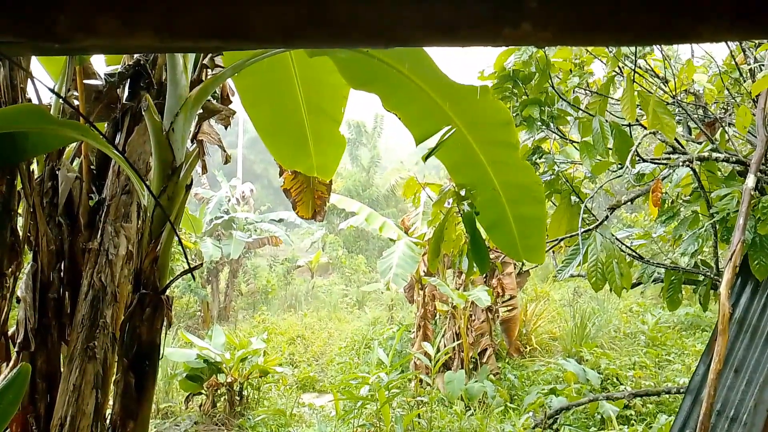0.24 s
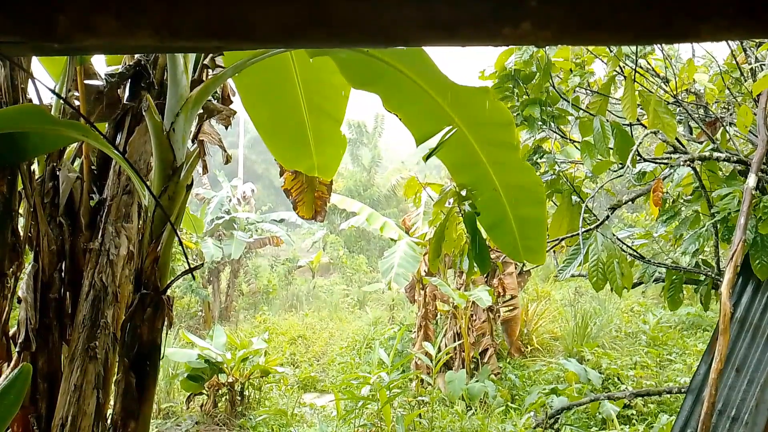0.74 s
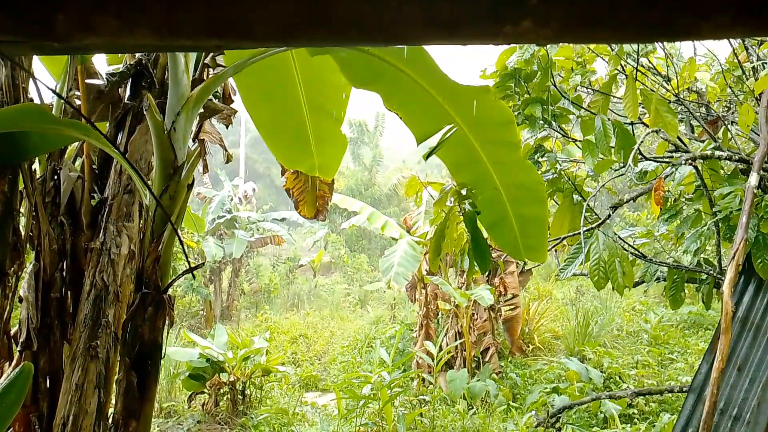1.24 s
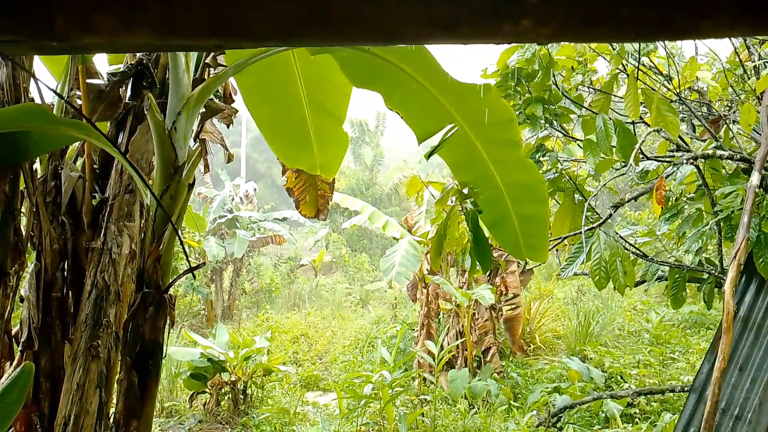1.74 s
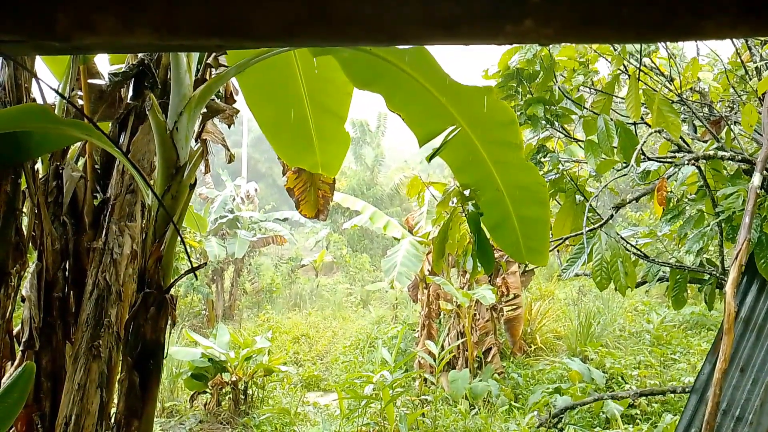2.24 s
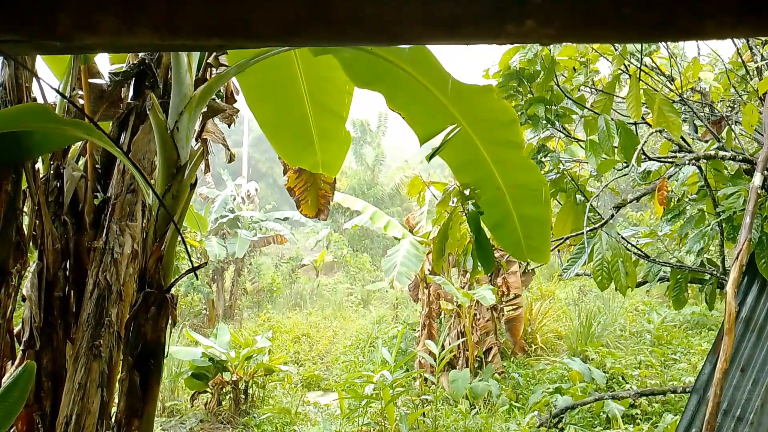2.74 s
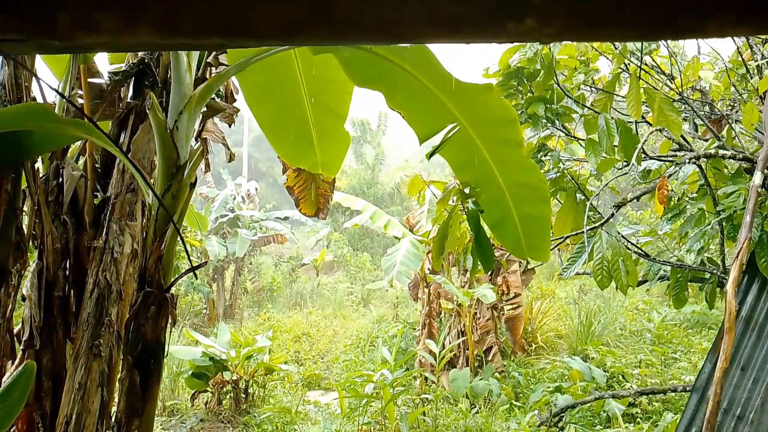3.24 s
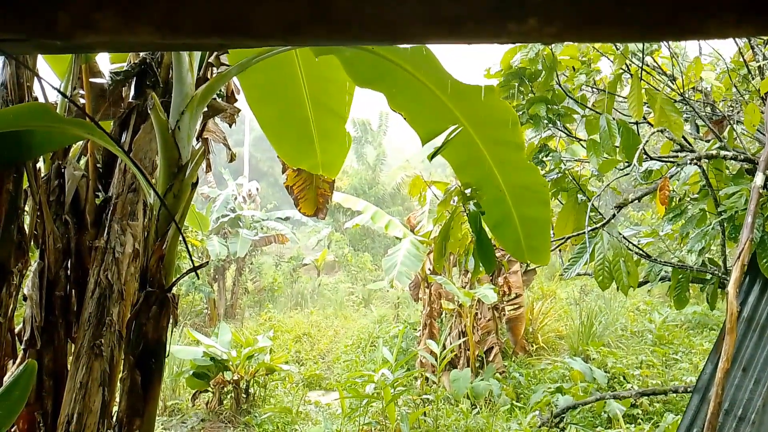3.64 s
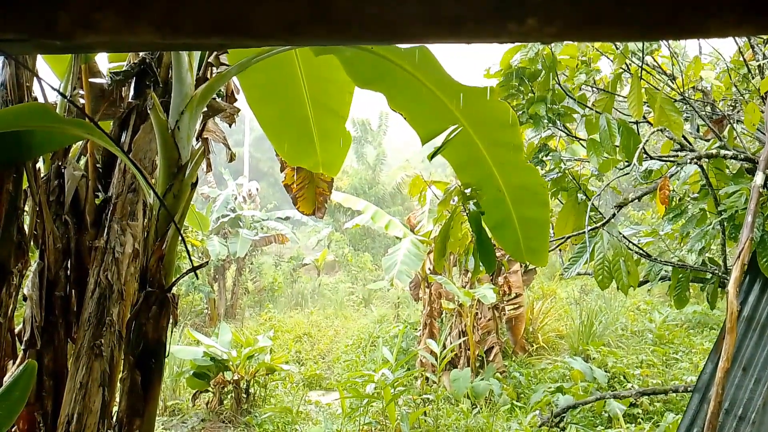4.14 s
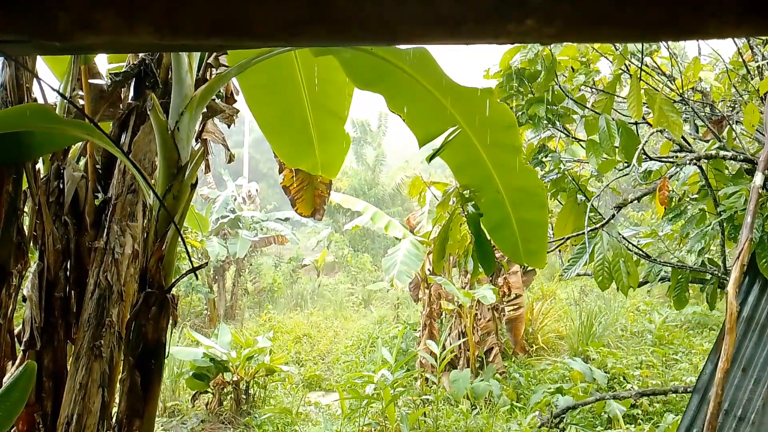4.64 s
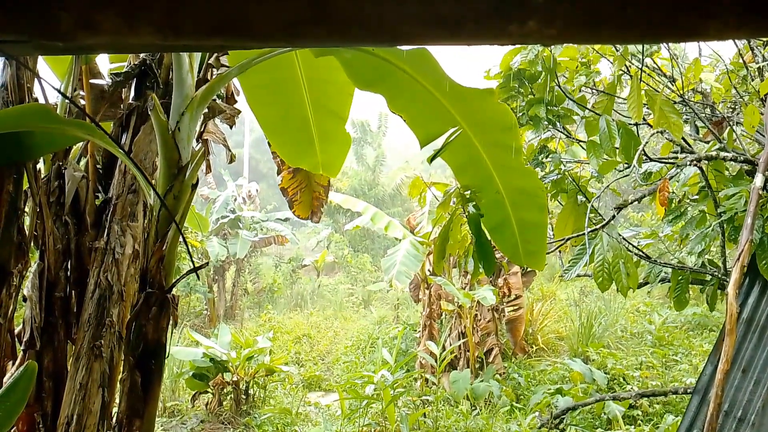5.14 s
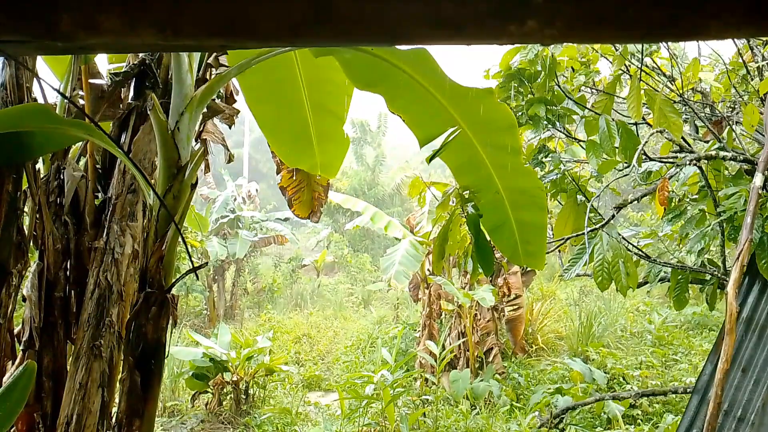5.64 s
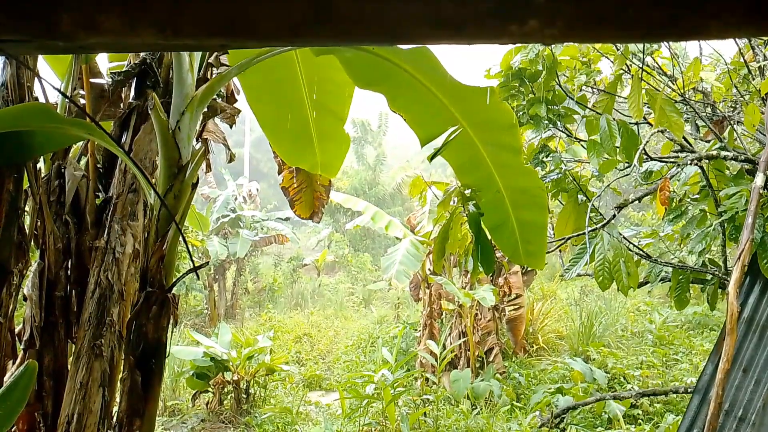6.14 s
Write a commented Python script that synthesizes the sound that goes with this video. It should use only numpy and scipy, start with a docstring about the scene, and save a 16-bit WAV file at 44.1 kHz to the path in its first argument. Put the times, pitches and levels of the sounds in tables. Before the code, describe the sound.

Heavy, steady rain falls on a forest garden for about six seconds, heard in mono from under the edge of a roof. From the start, distant drops merge into a dense hiss, while nearer ones patter on small leaves, drum on broad banana leaves and throw a fine ticking spray. From 0.4 seconds, fat drips splat close by at irregular moments, bright and sharp, with a very short echo from the shelter. From about 1 second, gathered water spills onto groups of leaves, making them ring louder in brief swells, most clearly around 2, 3.4 to 3.9, 4.5 and 5 to 5.6 seconds. Near 2.5 seconds, three quick heavy drops knock on a big hollow leaf, and two more follow at about 4.4 and 4.6 seconds. The overall level stays nearly even, and the rain picks up a little after 6 seconds.

```python
"""Heavy, steady rain on a forest garden, heard in mono from under the edge of a roof.
From the start, far drops merge into a wash; nearer ones patter on small leaves, drum on big ones and
throw fine spray. From 0.4 s on, fat drips splat close by; the shelter briefly echoes spray and drips.
From about 1 s, gathered water spills onto groups of leaves, making them ring louder. Near 2.5 s,
and again near 4.4 s, heavy drops knock on a big hollow leaf. The rain picks up a little at the end."""
import sys
import numpy as np
from scipy import signal
from scipy.fft import rfft, irfft
from scipy.io import wavfile

SR = 44100
rng = np.random.default_rng(int(sys.argv[2]) if len(sys.argv) > 2 else 0)


def digitize_waveform(pressure):
    """Quantize a signal to 16-bit integers and store it at the path in sys.argv[1].

    Rows of a 2-D input are taken as channels; values are limited to [-1, 1].
    """
    field = np.atleast_2d(pressure).T
    bounded = np.clip(field, -1, 1)
    quanta = np.round(bounded * 32767).astype(np.int16)
    wavfile.write(sys.argv[1], SR, quanta)


N = 282284
TIME = np.arange(N) / SR
FREQ = np.maximum(np.fft.rfftfreq(N, 1 / SR), 1)

# the rain gently builds, holds, eases and picks up again: (time [s], level [dB])
RAIN_LEVEL = [(0, -26.5), (0.75, -27), (1.05, -26), (1.6, -26), (2.0, -26), (2.85, -26), (3.55, -26),
              (4.6, -26), (5.0, -26.5), (6.0, -26.5), (6.3, -25.5)]
# tone of rain on leaves: (frequency [Hz], gain [dB])
FOLIAGE_TONE = [(240, -9.5), (330, -5.5), (420, -8.5), (1000, -4.5), (1550, -2), (1950, -1.1),
                (2280, -0.16), (2950, -6), (3450, -8.5), (3900, -8), (4450, -14), (5000, -19),
                (5550, -19.5), (7400, -32), (9200, -28)]
# hollow notes of the big leaves; wider ones die sooner: (pitch [Hz], width [Hz], level [dB])
BIG_LEAF_NOTES = [(698, 86, -4.5), (790, 133, -6.5), (1183, 110, -3), (1262, 92, -4)]
# tone of bursting water: (frequency [Hz], gain [dB])
SPLASH_TONE = [(500, -16), (2000, -7), (4000, 8.5), (6000, 7), (7500, -1), (10000, 3), (12500, 2),
               (15500, -4)]
# tone of the tiniest droplets: (frequency [Hz], gain [dB])
DROPLET_TONE = [(6000, -30), (10000, -10), (13000, 0)]
# fat drips close by: (time [s], strength [dB], middle of the splat's band [Hz])
FAT_DRIPS = [(0.379, -14, 8500), (1.186, -15, 15000), (1.298, -19, 7500), (1.3575, -20, 9000),
             (1.3843, -20, 8500), (1.625, -16, 8300), (1.968, -19, 9000), (2.005, -19, 8500),
             (2.066, -14, 14000), (2.8025, -15, 9800), (3.362, -12, 14000), (3.392, -22, 10500),
             (3.4962, -18.5, 8500), (3.5775, -16.5, 11500), (4.122, -19, 9000), (5.169, -21.5, 12000),
             (5.667, -19, 8000), (5.7055, -15, 13000), (5.7465, -21, 8500), (5.814, -22, 9000),
             (6.132, -18, 9500), (6.16, -19.5, 10000), (6.248, -17, 11000)]
# water spills onto a group of leaves; the larger they are, the lower they ring:
# (middle time [s], length [s], pitch [Hz], swell [dB])
WATER_SPILLS = [(1.14, 0.16, 1200, 2), (1.7, 0.76, 2710, 4.5), (1.756, 0.08, 1690, 6),
                (1.81, 0.05, 1200, 3), (1.94, 0.38, 330, 7), (2.043, 0.08, 1200, 4.5),
                (2.12, 0.051, 1680, 9), (2.32, 0.11, 2100, 6), (2.57, 0.12, 740, 1.5),
                (2.773, 0.1, 3200, 5), (3.4, 0.61, 2300, 5.5), (3.887, 0.08, 2450, 9),
                (4.11, 0.062, 764, 5), (4.39, 0.11, 880, 3), (4.53, 0.13, 1750, 7.5),
                (4.78, 0.06, 1200, 2.5), (5.042, 0.21, 338, 6.5), (5.15, 0.08, 2250, 5),
                (5.367, 0.1, 2450, 6.5), (5.55, 0.7, 353, 6.5), (5.59, 0.1, 2300, 6)]
# heavy drops on a big hollow leaf: (time [s], peak level [dB], pitch [Hz])
LEAF_KNOCKS = [(2.538, -22.5, 762), (2.563, -27, 710), (2.620, -27, 690), (4.349, -26, 757),
               (4.552, -24, 738)]
# the microphone weakens the lowest and highest sounds: (frequency [Hz], gain [dB])
MIC_TONE = [(20, -25), (40, -29), (80, -18.5), (108, -13), (140, -14.5), (175, -10.5), (205, -5),
            (270, 0), (9500, 0), (15000, -6.0)]


def gain(db):
    """Turn decibels into a number to multiply by."""
    return 10 ** (np.asarray(db) / 20)


def at_level(x, db=0):
    """Scale a sound to an average (rms) level."""
    return x * gain(db) / np.sqrt(np.mean(x ** 2))


def tone_curve(points):
    """Join (Hz, dB) points with straight lines, giving each octave equal room."""
    hz, db = np.transpose(points)
    return np.interp(np.log(FREQ), np.log(hz), db)


def bell(offset, width):
    """A smooth hill of height 1, with the given width halfway up."""
    return np.exp(-np.log(2) * (2 * offset / width) ** 2)


def shape_tone(x, points, extra_db=0):
    """Turn each frequency up or down along a tone curve."""
    return irfft(rfft(x) * gain(tone_curve(points) + extra_db), N)


def wander(rate_hz):
    """A random curve of typical size 1 that changes about rate_hz times a second."""
    slow_only = np.exp(-(FREQ / rate_hz) ** 2)
    return at_level(irfft(rfft(rng.standard_normal(N)) * slow_only, N))


def fade(age, fade_s):
    """A dying away that loses 60 dB every fade_s seconds."""
    return np.exp(-np.log(1000) * age / fade_s)


def impacts(per_s, spread_db):
    """Drops land at random moments: many small, few large."""
    lands = rng.random(N) < per_s / SR
    size = gain(spread_db * np.minimum(rng.exponential(size=N), 5))
    return lands * size * rng.choice([-1, 1], N)


def ring(taps, hz, fade_s):
    """Every tap makes a leaf ring with one fading note."""
    age = TIME[:SR // 10]
    note = np.sin(2 * np.pi * hz * age) * fade(age, fade_s)
    return at_level(signal.oaconvolve(taps, note)[:N])


def burst(fade_s):
    """A sudden puff of noise that dies away, with a total energy of 1."""
    age = TIME[:SR // 10]
    noise = rng.standard_normal(len(age)) * fade(age, fade_s)
    return noise / np.sqrt(np.sum(noise ** 2))


def ticks(per_s, spread_db, fade_s):
    """Each randomly landing drop bursts with a tick."""
    return signal.oaconvolve(impacts(per_s, spread_db), burst(fade_s))[:N]


def far_wash(waver_db=0.5, waver_hz=9):
    """Distant drops merge into hiss; each octave wavers a little as the leaves sway."""
    noise = rfft(rng.standard_normal(N))
    out = 0
    for octave in range(5, 15):
        band = np.maximum(1 - np.abs(np.log2(FREQ) - octave), 0)
        out += irfft(noise * band, N) * gain(waver_db * wander(waver_hz))
    return shape_tone(out, FOLIAGE_TONE)


def leaf_patter(leaves=48, low_hz=300, high_hz=5500, cycles=21, cluster_db=0.7, cluster_hz=14):
    """Drops come in clusters and tap small leaves; each leaf rings briefly at its own pitch."""
    pitches = np.linspace(np.sqrt(low_hz), np.sqrt(high_hz), leaves) ** 2
    out = 0
    for hz, swell_db in zip(pitches, spill_swells(pitches)):
        leaf = ring(impacts(per_s=190, spread_db=1.5), hz, fade_s=cycles / hz)
        weight = hz ** 0.25  # high pitches lie further apart, so each stands for more leaves
        out += weight * leaf * gain(swell_db)
    clusters = gain(cluster_db * wander(cluster_hz))
    return shape_tone(out * clusters, FOLIAGE_TONE)


def big_leaf_drumming(sway_db=0.46, sway_hz=5):
    """Drops drum on broad leaves that sway in and out of the rain; spills bring out their notes."""
    swells = spill_swells([hz for hz, _, _ in BIG_LEAF_NOTES])
    out = 0
    for (hz, width_hz, db), swell_db in zip(BIG_LEAF_NOTES, swells):
        fade_s = np.log(1000) / (np.pi * width_hz)
        leaf = ring(impacts(per_s=900, spread_db=1.1), hz, fade_s)
        out += leaf * gain(db + sway_db * wander(sway_hz) + swell_db)
    return at_level(out)


def spray(patches=16, flurry_db=2.0, flurry_hz=14):
    """Drops shatter on the nearest wet patches in little flurries of sharp ticks."""
    shatter = sum(ticks(per_s=45, spread_db=3.0, fade_s=0.012) for _ in range(patches))
    return at_level(shape_tone(shatter, SPLASH_TONE)) * gain(flurry_db * wander(flurry_hz))


def small_drips():
    """Small drips fall at random from the leaves all around."""
    return shape_tone(ticks(per_s=9, spread_db=6.0, fade_s=0.015), SPLASH_TONE)


def droplets():
    """The tiniest droplets burst in very short, very high ticks."""
    return shape_tone(ticks(per_s=40, spread_db=2.2, fade_s=0.004), DROPLET_TONE)


def shelter_echo(x, echo_db=-9, fade_s=0.09):
    """Roof and wall send back a short, blurred echo."""
    delayed = np.pad(x, (SR // 200, 0))  # 5 ms late
    return gain(echo_db) * signal.oaconvolve(delayed, burst(fade_s))[:N]


def fat_drips(crack_s=0.012, scatter_s=0.04, scatter_db=-4, half_band_hz=2900):
    """Each drip cracks on a leaf in its own band of high sound; its scattering droplets fade later."""
    out = np.zeros(N + SR)
    for time_s, db, hz in FAT_DRIPS:
        splat = burst(crack_s) + gain(scatter_db) * burst(scatter_s)
        edges_hz = [hz - half_band_hz, hz + half_band_hz]
        band = signal.butter(2, edges_hz, "bandpass", fs=SR, output="sos")
        start = int(time_s * SR)
        out[start:start + len(splat)] += gain(db) * signal.sosfilt(band, splat)
    return shape_tone(out[:N], SPLASH_TONE)


def spill_swells(pitches, width_octaves=0.69):
    """Leaves near a spill's pitch grow louder, then settle: one curve in dB for each leaf."""
    middle_s, length_s, hz, db = np.transpose(WATER_SPILLS)
    when = bell(TIME - middle_s[:, None], length_s[:, None])
    nearness = bell(np.log2(np.array(pitches)[:, None] / hz), width_octaves)
    return (nearness * db) @ when  # add up all the spills


def leaf_knocks(fade_s=0.09):
    """A heavy drop sets a broad leaf ringing for a moment."""
    out = 0
    for time_s, db, hz in LEAF_KNOCKS:
        age = np.maximum(TIME - time_s, 0)
        out += gain(db) * np.sin(2 * np.pi * hz * age) * fade(age, fade_s)
    return out


def scene(drum_follow=1.9, spray_follow=0.5):
    """One downpour drives the wash and patter, the drumming more strongly and the spray more weakly."""
    rain_db = np.interp(TIME, *np.transpose(RAIN_LEVEL))
    average_db = rain_db.mean()
    surge_db = rain_db - average_db
    wash = at_level(far_wash(), db=-1.69) * gain(rain_db)
    patter = at_level(leaf_patter(), db=-6.5) * gain(rain_db)
    drumming = big_leaf_drumming() * gain(average_db - 7.5 + drum_follow * surge_db)
    near = spray() * gain(-52 + spray_follow * surge_db)
    near += fat_drips()
    near += at_level(small_drips(), db=-67)
    near += at_level(droplets(), db=-63)
    return (wash + patter + drumming + near + shelter_echo(near) + leaf_knocks())[None]


def record(dry, top_hz=15450):
    """The microphone thins both ends, has a narrow low dip and a wide high one, and cuts the top."""
    low_dip_db = -19 * bell(FREQ - 168.3, width=29)
    high_dip_db = -11 * bell(FREQ - 12680, width=3900)
    heard = shape_tone(dry[0], MIC_TONE, low_dip_db + high_dip_db)
    top_cut = signal.ellip(12, 0.1, 70, top_hz, fs=SR, output="sos")
    return signal.sosfilt(top_cut, heard)[None]


dry = scene()
out = record(dry)
digitize_waveform(out)
```